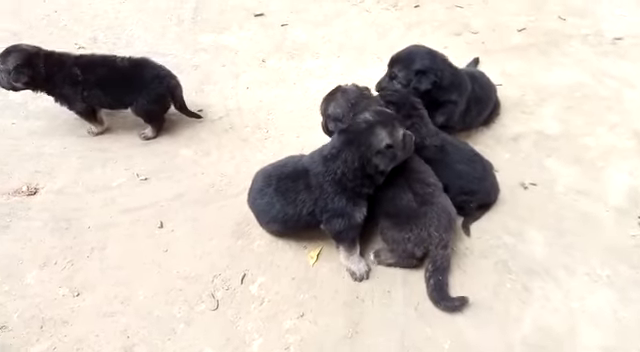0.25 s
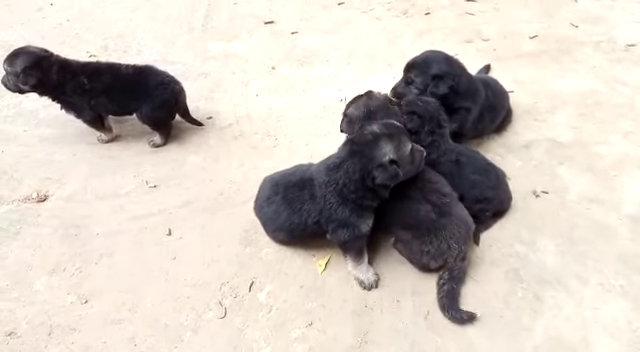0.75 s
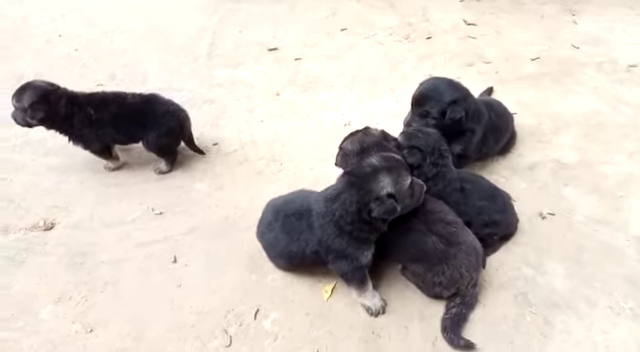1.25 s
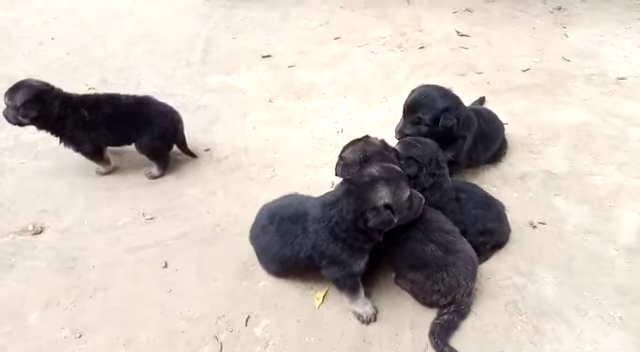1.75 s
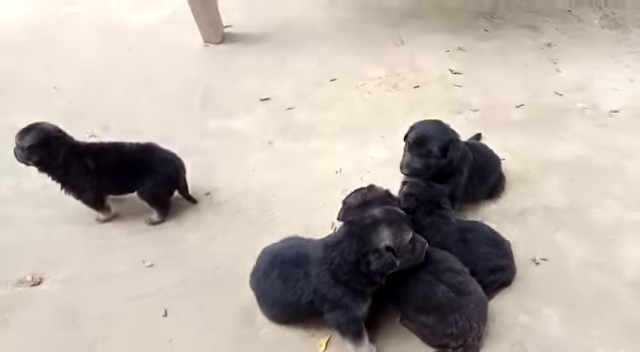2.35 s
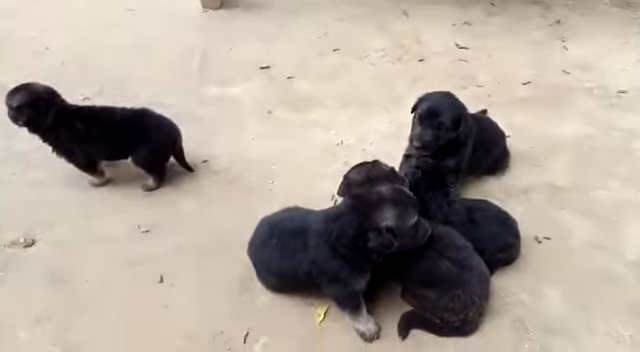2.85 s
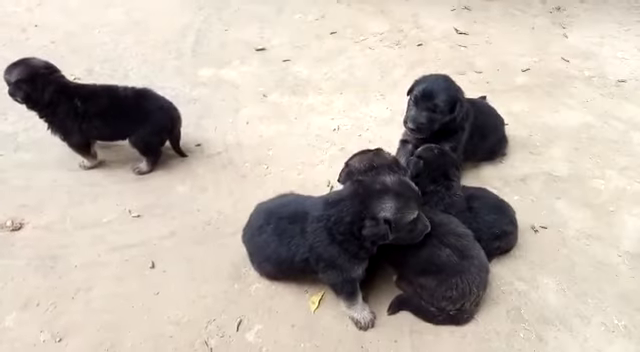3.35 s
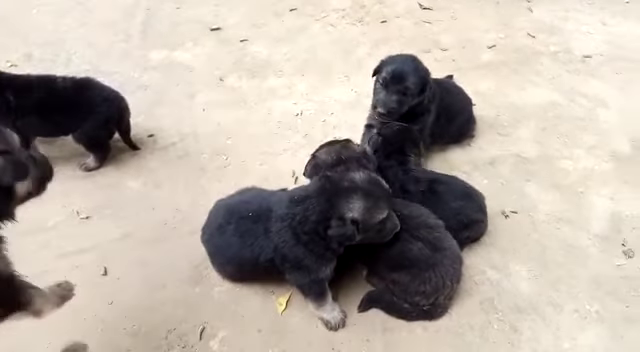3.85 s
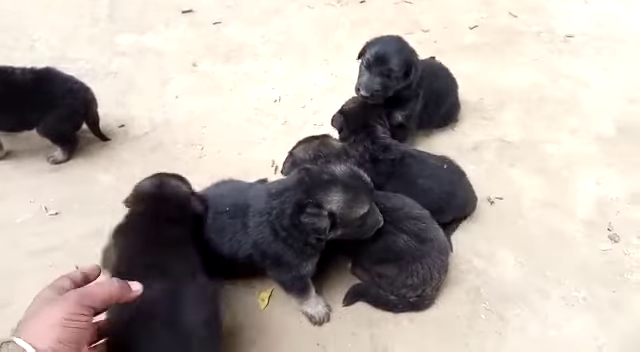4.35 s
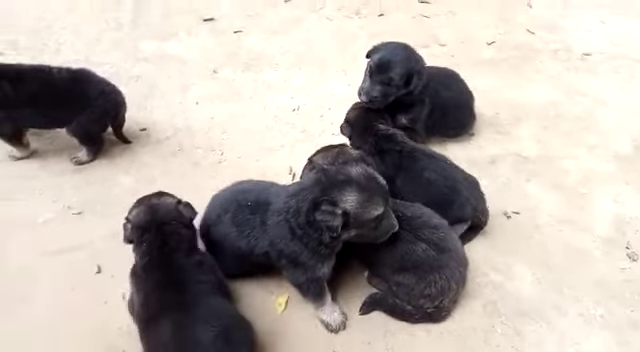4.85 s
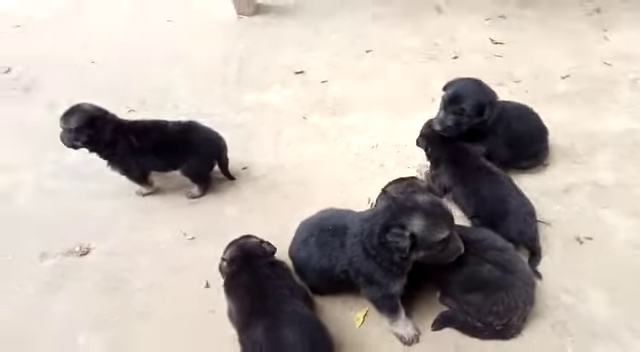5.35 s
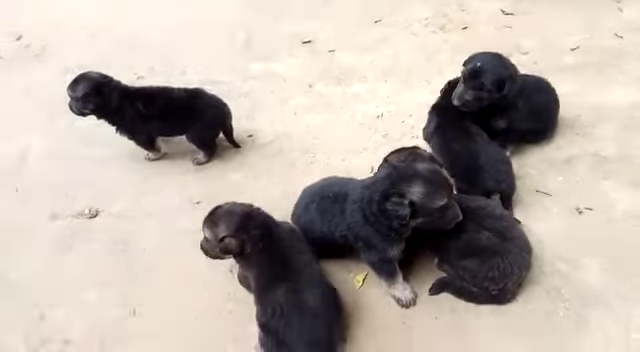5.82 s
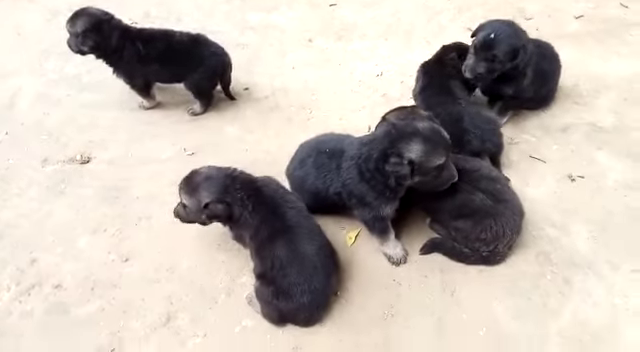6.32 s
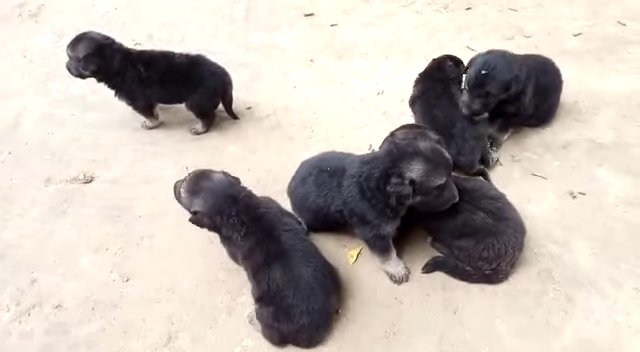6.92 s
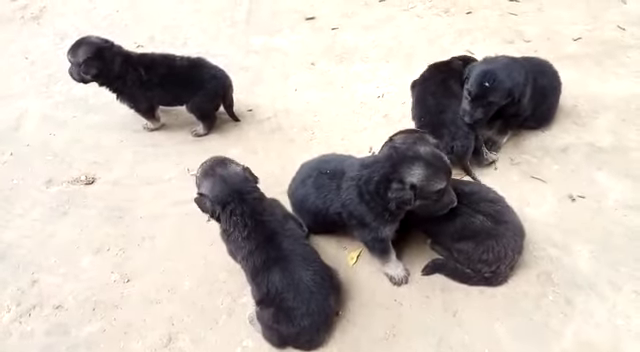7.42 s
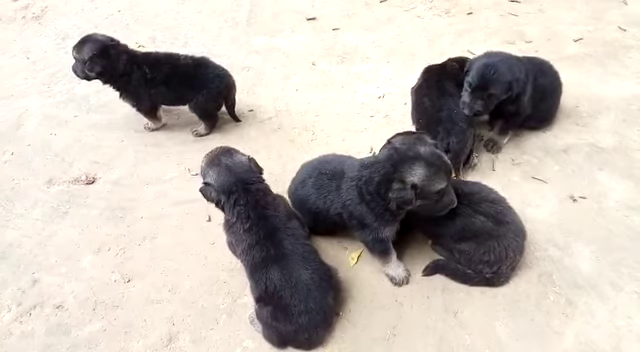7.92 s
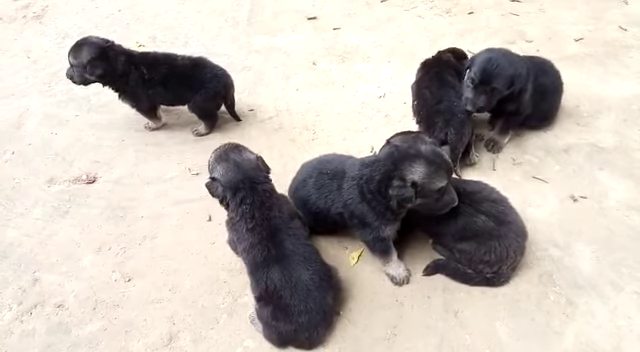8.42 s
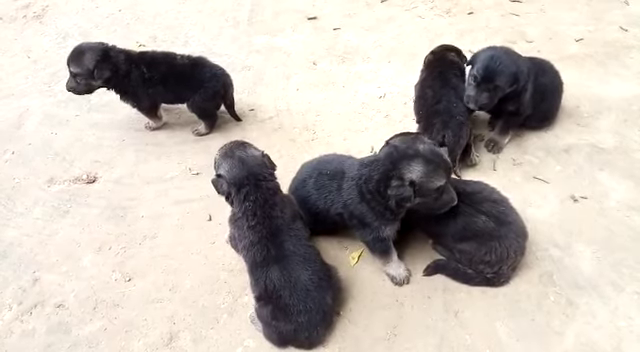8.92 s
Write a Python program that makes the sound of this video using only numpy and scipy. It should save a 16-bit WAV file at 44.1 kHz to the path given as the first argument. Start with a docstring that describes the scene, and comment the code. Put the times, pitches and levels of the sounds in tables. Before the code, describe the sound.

Close to the microphone, a litter of small puppies makes soft overlapping whines and short hoarse grunts. Three longer piercing whines come before the middle, then low moans and rasps, then a run of louder, sharp yelps. Small mouth smacks and nose huffs sit between. A little bird whistles quick phrases farther off in a walled outdoor yard, over faint rumble and rustle.

```python
"""Puppy litter in a walled yard

Thin arched whines overlap with hoarse grunts and sharp yelps: overtone stacks and rung pulse trains.
Smacks are damped noise pops, nose huffs shaped hiss. A small bird repeats two phrases of swept whistles.
Thin chirps of very high narrow noise fade out early on; rumble, rustle and hiss lie beneath.
Walls throw back the puppies, smacks and bird; both channels are alike.
"""
import sys
import numpy as np
from scipy import signal
from scipy.fft import rfft, irfft, next_fast_len
from scipy.io import wavfile
from scipy.ndimage import uniform_filter1d

SR = 44100
rng = np.random.default_rng(int(sys.argv[2]) if len(sys.argv) > 2 else 0)


def materialize(psi):
    """Save the field psi as 16-bit PCM at rate SR to the path in sys.argv[1].

    A 1-D psi becomes a single channel; in a 2-D psi each row is a channel.
    """
    bounded = np.clip(np.atleast_2d(psi).T, -1, 1)
    quanta = np.round(bounded * 32767).astype(np.int16)
    wavfile.write(sys.argv[1], SR, quanta)


N = 404838

# Puppy throat and mouth response: (frequency [Hz], relative level [dB])
THROAT_RESPONSE = [(700, 9), (1200, 7.5), (1700, 0.5), (2300, -2), (2900, -12), (3500, -30), (4200, -12),
                   (5100, 0), (6000, -10), (7000, -27.5), (8800, -37.5), (11500, -27), (15500, -52)]
# Open-mouthed yelps: (start [s], length [s], attack [s], hesitation [s], rise [s], first pitch [Hz],
#   top pitch [Hz], sagged pitch [Hz], final drop [0-1], fundamental before trim [dB],
#   fundamental swell over the call [dB], mouth overtones before trim [dB],
#   piercing overtones before trim [dB], overtone swell over the call [dB])
YELP_CALLS = [(2.52, .34, 0.028, 0.00043, 0.11, 1014, 1223, 1222, 0.31, -38, -14, -43.5, -33.5, 2),
              (3.037, 0.33, 0.025, 0.00065, 0.096, 1005, 1144, 1077, 0.14, -34, 7, -42.5, -28.5, 3.5),
              (3.579, 0.38, 0.056, 0.00066, 0.02, 1090, 1123, 1026, 0.19, -30.5, 15.5, -40, -28.5, 4.5),
              (5.939, 0.14, 0.04, 0, 0.12, 624, 1604, 1550, .09, -29, -39, -49.5, -35, -18),
              (6.29, 0.17, .035, 0.0043, 0.06, 1267, 1737, 1828, .15, -25, 12.5, -31, -16, -7),
              (6.638, 0.2, 0.017, .003, .09, 1191, 1719, 1293, 0.02, -22.5, 1.5, -34, -24, -27),
              (7.001, 0.2, 0.051, 0.0054, 0.07, 1213, 1618, 1253, .02, -20, 5, -39.5, -35, -21),
              (7.364, 0.27, 0.034, 0.017, 0.071, 1138, 1557, 1394, .1, -28.5, -20.5, -47.5, -47, -3.5),
              (8.41, .24, 0.071, .05, 0.078, 1166, 1450, 1409, 0.01, -25.5, 3.5, -29.5, -25.5, -18),
              (9.04, .15, 0.083, 0.0037, 0.08, 1002, 1088, 1023, 0.1, -42.5, 28, -35.5, -33, 8)]
# Soft whimpers: (start [s], length [s], rise [s], first pitch [Hz], top pitch [Hz], sagged pitch [Hz],
#   final drop [0-1], fundamental before trim [dB], fundamental swell over the call [dB],
#   overtones before trim [dB])
WHIMPER_CALLS = [(0.069, 0.42, 0.2, 950, 1230, 1130, 0.38, -41.5, -5, -50),
                 (0.098, 0.38, 0.018, 1148, 1115, 1064, 0.08, -46.5, -2, -45.0),
                 (0.548, 0.14, 0.085, 1014, 1417, 1191, 0, -45.5, -0.0, -47),
                 (0.801, 0.38, 0.11, 762, 1230, 807, 0.17, -42.5, 4.0, -57.5),
                 (0.895, 0.093, 0.032, 1262, 1562, 1174, 0.03, -34, 5, -38.5),
                 (1.458, 0.45, 0.07, 795, 1064, 717, 0.09, -43.5, 4, -54.5),
                 (2.018, 0.32, 0.18, 968, 1133, 992, 0.31, -43, 1.5, -52.5),
                 (2.381, 0.17, 0.0049, 930, 891, 858, 0.05, -44, 6.0, -56.5),
                 (3.12, 0.2, 0.063, 1147, 1153, 701, 0.38, -40, -10, -45.5),
                 (3.328, 0.35, 0.098, 514.5, 400.7, 370, 0.05, -51, 5, -57.0),
                 (3.95, 0.22, 0.0098, 879, 850, 680, 0.39, -44.5, 0, -52.5),
                 (3.97, 0.31, 0.161, 1195, 1252, 1263, 0.06, -40.5, -4, -48),
                 (4.458, 0.4, 0.086, 312.5, 405.2, 308, 0.02, -45.5, -12, -61.5),
                 (4.532, 0.29, 0.072, 1370, 1280, 1088, 0, -37.0, -4.5, -46),
                 (4.547, 0.31, 0.02, 816, 795, 660, 0.06, -42.5, 0, -64),
                 (4.55, 0.28, 0.018, 1005, 964, 850, 0.03, -55, -21, -78),
                 (4.877, 0.13, 0.012, 593, 546.5, 331, 0.01, -42.5, 4, -58),
                 (5.035, 0.12, 0.063, 1183, 1182, 940, 0.02, -34, 5, -45),
                 (5.136, 0.25, 0.073, 900, 895, 915, 0, -42.5, -10, -55.5),
                 (5.359, 0.38, 0.068, 624, 788.5, 660, 0.64, -42, 3, -53.5),
                 (5.449, 0.12, 0.126, 955, 1450, 1498, 0.07, -42.5, -4.0, -50),
                 (6.018, 0.52, 0.034, 798, 775.5, 639, 0.75, -45.0, -3, -56.0),
                 (6.837, 0.16, 0.088, 723, 807, 748, 0.1, -43.5, 11, -54),
                 (6.979, 0.44, 0.074, 660.6, 708, 617, 0.4, -49, -5, -59),
                 (7.321, 0.15, 0.023, 778, 800, 740, 0.14, -44.5, 2, -61),
                 (7.382, 0.071, 0.096, 590, 783, 608, 0.01, -49, -18, -63),
                 (7.486, 0.2, 0.049, 595, 754, 560, 0.1, -46.5, -6, -63.5),
                 (7.804, 0.28, 0.074, 1067, 1507, 1354, 0.05, -35, 5.5, -46.5),
                 (7.859, 0.4, 0.059, 1010, 1231, 627, 0.0, -42.5, 3, -53),
                 (8.413, 0.25, 0.083, 642, 693, 708, 0, -53.5, -6, -56),
                 (8.602, 0.45, 0.082, 706, 796, 657, 0.39, -41.5, -2.5, -55.0)]
# Voice cracks, the waveform repeating every few cycles: (start [s], end [s], period [cycles], depth [0-1])
VOICE_CRACKS = [(3.016, 3.09, 3, 1), (3.572, 3.67, 3, 0.46), (3.977, 4.29, 3, 0.35), (4.555, 4.85, 6, 0.1),
                (5.033, 5.364, 5, 0.39), (9.026, 9.184, 2, 0.37)]
# Hoarse grunts and rasps: (start [s], end [s], resonance [Hz], width [Hz], level before trim [dB])
GRUNTS = [(0.035, 0.081, 1490, 151, -38.5), (0.274, 0.398, 845, 206, -34), (0.282, 0.378, 1550, 190.0, -38),
          (0.661, 0.722, 898, 78.6, -36), (1.153, 1.191, 545, 440, -38), (1.412, 1.416, 698, 79, -33.5),
          (1.846, 1.911, 670, 194, -40), (2.126, 2.14, 1290, 1240, -56), (2.322, 2.36, 712, 188, -36),
          (2.514, 2.578, 730, 204, -37), (2.765, 2.838, 1086, 690, -38), (2.861, 3.043, 1500, 1110, -41.5),
          (2.97, 3.08, 1323, 160, -36), (3.262, 3.386, 1710, 256, -32.5), (3.557, 3.627, 725, 215, -39.5),
          (3.773, 3.834, 697, 242, -43.5), (4.125, 4.301, 1280, 433, -42.5), (4.22, 4.289, 426, 51, -37),
          (4.959, 5.302, 2194, 286, -41), (5.082, 5.362, 1013, 335, -35), (5.585, 5.808, 1017, 385, -36.5),
          (5.996, 6.298, 1006, 326, -35), (6.052, 6.29, 1800, 430.0, -44), (6.527, 6.607, 1030, 336, -37),
          (7.046, 7.062, 2105, 310.0, -36), (7.377, 7.457, 432, 90, -51), (7.501, 7.674, 415, 111, -62),
          (8.371, 8.416, 2120, 423, -33), (9.149, 9.189, 2450, 380, -31)]
# Turbulence in a rasp by its length: (length [s], turbulence rms re pulse rms [ratio])
RASP_TURBULENCE = [(.13, .76), (.21, .33)]
# Low creaking grumble: (start [s], end [s], resonance [Hz], width [Hz], level [dB])
GRUMBLE = (4.29, 4.5, 1194, 2000, -54.5)
# Small scuffs and mouth smacks: (time [s], peak before trim [dB], ring [Hz])
SMACK_EVENTS = [(0.014, -25.5, 765), (0.77, -49, 785), (1.41, -57, 708), (1.639, -23.5, 593),
                (2.12, -26, 1100), (2.386, -26, 930), (6.636, -30, 2510), (7.423, -23, 1440)]
# Hissy nose huffs: (start [s], end [s], level [dB])
NOSE_HUFFS = [(0.266, 0.422, -45), (0.624, 0.714, -41.5), (1.32, 1.51, -48.5), (2.474, 2.85, -56),
              (2.938, 3.434, -53), (3.315, 3.416, -45), (3.497, 3.968, -43), (4.135, 4.326, -48.5),
              (4.672, 5.005, -53.5), (4.984, 5.343, -46.5), (5.915, 6.1, -43), (6.118, 6.27, -54),
              (8.273, 8.44, -50)]
# Bird notes in each phrase: (time in phrase [s], length [s], first pitch [Hz], middle pitch [Hz],
#   last pitch [Hz], level re phrase [dB])
SONG_NOTES = [(.001, .012, 5870, 7040, 5600, -5.5), (.011, 0.016, 5540, 6080, 5500, 4.5),
              (.028, 0.026, 5570, 5220, 6330, 9.5), (.056, 0.022, 8100, 6520, 6040, -1),
              (.092, .02, 7740, 6750, 5850, 0), (.11, 0.044, 5770, 4950, 3700, 4)]
TWITTER_NOTES = [(0, 0.0136, 5500, 5850, 5086, -12.5), (.012, .02, 5030, 4900, 4630, -2),
                 (.034, .018, 3620, 4210, 3730, -12), (.056, .032, 3650, 4250, 3300, -5.5)]
# Starts of each bird phrase: (time [s], level [dB])
SONG_STARTS = [(0.098, -27.5), (3.758, -27), (7.822, -23)]
TWITTER_STARTS = [(0.481, -26.5), (1.517, -27), (2.762, -24), (3.91, -27.5), (4.986, -29), (5.959, -32.5),
                  (6.843, -27.5), (8.249, -25.5)]
# Background level: (time [s], low rustle before trim [dB], high hiss before trim [dB])
BACKGROUND_LEVELS = [(0, -51.5, -61.5), (2.7, -52.5, -66.5), (3.9, -50.5, -52.5), (5.2, -44, -82),
                     (5.5, -65, -66), (6.1, -50, -74), (6.801, -76, -69), (7.698, -61, -69),
                     (8.4, -51, -69), (9.18, -65, -69)]
# Noise colours: (frequency [Hz], relative level per Hz [dB])
HISS_COLOUR = [(2000, -7), (3300, -9), (4200, 6), (5200, 5.5), (6500, -13.5), (8500, -7), (11500, 4),
               (14000, -14), (15800, -2)]
RUSTLE_COLOUR = [(100, -27), (200, 4), (400, 1), (800, 5), (1500, 3.5), (2300, 6), (3200, -22.5),
                 (4300, -28), (5200, 0), (6800, -31), (15000, -26.5)]
RUMBLE_COLOUR = [(20, -33), (62, 2.5), (100, 2), (160, -2.5), (1000, -35), (15000, -41.5)]
# Diffuse tail decay: (frequency [Hz], time to fall 60 dB [s])
WALL_DECAY = [(200, 0.78), (1000, 0.32), (2500, 0.39), (5000, 0.32), (9000, 0.43), (15000, 0.19)]
# Wall echoes: (delay [s], gain before trim [ratio])
WALL_ECHOES = [(.0047, 0.24), (0.012, 0.11), (0.022, 0.15), (0.036, 0.1), (0.051, 0.1)]

EDGE_HZ = 15850
TIME_S = np.arange(N) / SR
SAG_CURVE, DROP_S = 1.3, .022  # pitch sags ever faster as breath runs out, drops as the folds let go
BASE_DB_PER_OCTAVE, RING_DB_PER_OCTAVE = 58, 17  # a yelp weakens away from its top pitch
ATTACK_DB, RELEASE_S, RELEASE_DB = -12.5, 0.026, -15  # release acts on the piercing overtones
GAPE_DB, GAPE_S = 10.5, 0.032  # the mouth gapes for a moment as the attack ends
WHIMPER_EDGE_S, WHIMPER_EDGE_DB = 0.036, -3
HUFF_EDGE_S = 0.046
NOTE_EDGE_DB = -10
CHIRP_START_S, CHIRP_PERIOD_S, CHIRP_LENGTH_S = 0.016, .268, 0.1
CHIRP_HZ, CHIRP_DB_AT_ZERO_S, CHIRP_FADE_DB_PER_S = 13370, -54.5, -8


def amp(db):
    """Decibels to gain."""
    return 10 ** (np.asarray(db) / 20)


def evened(x):
    """Scales to an rms of one."""
    return x / np.sqrt(np.mean(x ** 2) + 1e-20)


def read(points, hz):
    """Interpolates a spectrum on a log-frequency axis."""
    point_hz, value = np.transpose(points)
    return np.interp(np.log(hz + 1), np.log(point_hz + 1), value)


def add(mix, start_s, sound):
    """Lays a sound into the mix."""
    part = mix[max(round(start_s * SR), 0):][:len(sound)]
    part += sound[:len(part)]


def noise(size, gain):
    """Noise with the spectrum gain(Hz), scaled to rms one before trimming to size."""
    n = next_fast_len(size + 4096)
    spectrum = rfft(rng.standard_normal(n)) * gain(np.fft.rfftfreq(n, 1 / SR))
    return evened(irfft(spectrum, n))[:size]


def wander(size, rate_hz):
    """Random tremble: noise low-passed near rate_hz, nominal rms one."""
    step, pad = 16, 256  # one slow point per 16 samples
    n = next_fast_len(size // step + pad)
    lowpass = 1 / (1 + (np.fft.rfftfreq(n, step / SR) / rate_hz) ** 4)
    slow = irfft(rfft(rng.standard_normal(n)) * lowpass, n)
    return np.interp(np.arange(size) / step, np.arange(n), evened(slow))


def fade(t_s, edge_s):
    """Soft start and end, sine squared."""
    to_edge_s = np.minimum(t_s - t_s[0], t_s[-1] - t_s)
    return np.sin(np.pi / 2 * np.clip(to_edge_s / edge_s, 0, 1)) ** 2


def play(rows, margin_s):
    """Sample times around a table, and its columns joined by lines."""
    row_s, *columns = np.transpose(rows)
    t_s = np.arange(row_s.min() - margin_s, row_s.max() + margin_s, 1 / SR)
    return t_s, [np.interp(t_s, row_s, column) for column in columns]


def puppies(yelp_trim_db=1, whimper_trim_db=1, rasp_trim_db=-1, muffle_db=-3):
    """The litter: glottal overtone stacks for yelps and whimpers, rung pulses for grunts and grumble."""
    out = np.zeros(N)
    for call in YELP_CALLS:
        start_s, sound = cry(yelp(*call))
        add(out, start_s, amp(yelp_trim_db) * sound)
    for call in WHIMPER_CALLS:
        # a nearly shut mouth muffles the piercing overtones
        rows = [(*row, row[-1] + muffle_db) for row in whimper(*call)]
        start_s, sound = cry(rows, quaver=0.00938, jitter=0.0029, shimmer_db=2.0)
        add(out, start_s, amp(whimper_trim_db) * sound)
    for row in GRUNTS:
        turbulence = np.interp(row[1] - row[0], *np.transpose(RASP_TURBULENCE))
        start_s, sound = rasp(*row, turbulence=turbulence)
        add(out, start_s, amp(rasp_trim_db) * sound)
    add(out, *rasp(*GRUMBLE, flap_hz=100.5, turbulence=0.18))
    return out


def yelp(start_s, length_s, attack_s, hold_s, rise_s, first_hz, top_hz, sagged_hz, drop,
         base_db, swell_db, mouth_db, ring_db, overtone_swell_db):
    """Yelp pitch and levels: overtones swell in, loudness falls as pitch leaves its top."""
    t_s, progress, hz = arch(length_s, hold_s, rise_s, first_hz, top_hz, sagged_hz, drop)
    slack_octaves = np.minimum(abs(np.log2(hz / top_hz)), .5)
    attack_db = ATTACK_DB * np.clip(1 - t_s / attack_s, 0, 1)
    release_db = RELEASE_DB * np.clip(1 - (length_s - t_s) / RELEASE_S, 0, 1)
    overtone_db = attack_db + overtone_swell_db * progress
    gape_db = GAPE_DB * np.exp(-((t_s - attack_s) / GAPE_S) ** 2)
    return np.transpose([
        start_s + t_s,
        hz,
        base_db + swell_db * progress - BASE_DB_PER_OCTAVE * slack_octaves,
        mouth_db + overtone_db + gape_db,
        ring_db + overtone_db + release_db - RING_DB_PER_OCTAVE * slack_octaves])


def whimper(start_s, length_s, rise_s, first_hz, top_hz, sagged_hz, drop, base_db, swell_db, overtone_db):
    """Whimper pitch and levels: steady overtones, soft ends."""
    t_s, progress, hz = arch(length_s, 0, rise_s, first_hz, top_hz, sagged_hz, drop)
    ease_db = WHIMPER_EDGE_DB * (1 - fade(t_s, WHIMPER_EDGE_S))
    return np.transpose([start_s + t_s, hz, base_db + swell_db * progress + ease_db, overtone_db + ease_db])


def arch(length_s, hold_s, rise_s, first_hz, top_hz, sagged_hz, drop):
    """Cry pitch: scoop to the top, slow sag, quick last drop; returns times, progress -.5 to .5, Hz."""
    t_s = np.linspace(0, length_s, 80)
    scoop = (1 - np.clip((t_s - hold_s) / rise_s, 0, 1)) ** 2
    sag_length_s = max(length_s - hold_s - rise_s, .01)
    sag = np.clip((t_s - hold_s - rise_s) / sag_length_s, 0, 1) ** SAG_CURVE
    hz = top_hz + (first_hz - top_hz) * scoop + (sagged_hz - top_hz) * sag
    hz = hz * (1 - drop * np.exp((t_s - length_s) / DROP_S))
    return t_s, t_s / length_s - .5, hz


def cry(rows, quaver=.006, jitter=0.0031, shimmer_db=1.98, air_db=-33, onset_rough=3.2):
    """Vocal folds make a stack of overtones that glides through the throat's resonances."""
    t_s, (hz, base_db, mouth_db, ring_db) = play(rows, margin_s=.007)
    n = len(t_s)
    unsettled = 1 + onset_rough * (1 - fade(t_s, 0.066))  # folds are unsteady as they start and stop
    hz = uniform_filter1d(hz, size=600) * (1 + quaver * wander(n, 26.3))
    jittered_hz = hz * (1 + jitter * unsettled * wander(n, 250))
    phase = 2 * np.pi * np.cumsum(jittered_hz) / SR
    flutter = np.zeros(n)
    for start_s, end_s, cycles, depth in VOICE_CRACKS:
        inside = np.clip(np.minimum(t_s - start_s, end_s - t_s) / 0.00085, 0, 1)
        flutter += depth * inside * (np.cos(phase / round(cycles)) + 0.44 * wander(n, 280))
    voice = amp(base_db) * np.sin(phase)
    for k in range(2, int(EDGE_HZ / np.median(hz)) + 1):
        high = np.clip((k * hz - 3050) / 450, 0, 1)  # 0 in the mouth's range, 1 in the piercing one
        level_db = read(THROAT_RESPONSE, k * hz) + (1 - high) * mouth_db + high * ring_db
        overtone = amp(level_db + shimmer_db * wander(n, 16.3)) * np.sin(k * phase)
        voice += overtone * (k * hz < SR / 2)
    # turbulence at the folds
    air = noise(n, lambda f_hz: amp(read(THROAT_RESPONSE, f_hz)) * (f_hz > 1900))
    air = air * unsettled * amp(air_db + np.maximum(mouth_db, ring_db))
    sound = voice * (1 + flutter) + air
    return t_s[0], np.sqrt(2) * sound * fade(t_s, 0.0046) * amp(shimmer_db * wander(n, 62))


def rasp(start_s, end_s, hz, width_hz, level_db, turbulence, flap_hz=284, uneven=0.03, throat_db=-19):
    """Slack folds flap unevenly; their pulses and some turbulence ring one resonance."""
    t_s = np.arange(start_s - .008, end_s + 0.01, 1 / SR)
    n = len(t_s)
    f_hz = np.fft.rfftfreq(n, 1 / SR)
    turns = np.cumsum(flap_hz * (1 + uneven * wander(n, 70))) / SR
    pulses = evened(np.diff(np.floor(turns), prepend=0))
    drive = rfft(pulses + turbulence * rng.standard_normal(n))
    ring = evened(irfft(drive / (1 + (2 * (f_hz - hz) / width_hz) ** 4), n))
    throat = evened(irfft(drive * amp(read(THROAT_RESPONSE, f_hz)) * (f_hz > hz), n))
    return t_s[0], amp(level_db) * evened((ring + amp(throat_db) * throat) * fade(t_s, 0.027))


def smacks(decay_s=0.0045, trim_db=-5):
    """Mouths and paws pop: noise round one ring frequency, quickly damped."""
    out, t_s = np.zeros(N), np.arange(2000) / SR
    for start_s, peak_db, hz in SMACK_EVENTS:
        ringing = noise(len(t_s), lambda f_hz: f_hz / (f_hz + hz) / (1 + ((f_hz - hz) / (0.64 * hz)) ** 2))
        pop = ringing * t_s * np.exp(-t_s / decay_s)
        add(out, start_s - .002, amp(peak_db + trim_db) * pop / abs(pop).max())
    return out


def huffs():
    """Air hisses through a nose, swelling and stopping softly."""
    level = np.zeros(N)
    for start_s, end_s, level_db in NOSE_HUFFS:
        t_s = np.arange(start_s, end_s, 1 / SR)
        add(level, start_s, amp(level_db) * fade(t_s, HUFF_EDGE_S))
    return level * patchy(HISS_COLOUR, depth_db=6.5)


def bird(warble=0.024):
    """A nearly pure whistle swept quickly through each note."""
    out = np.zeros(N)
    for notes, starts in ((SONG_NOTES, SONG_STARTS), (TWITTER_NOTES, TWITTER_STARTS)):
        for start_s, phrase_db in starts:
            for note in notes:
                t_s, (hz, note_db) = play(bird_note(*note), margin_s=.001)
                phase = 2 * np.pi * np.cumsum(hz * (1 + warble * wander(len(t_s), 300))) / SR
                whistle = np.sin(phase) + 0.022 * np.sin(2 * phase)
                add(out, start_s + t_s[0], amp(phrase_db + note_db) * whistle * fade(t_s, 0.00033))
    return out


def bird_note(start_s, length_s, first_hz, middle_hz, last_hz, level_db):
    """One note: pitch bends once through three values, loudest mid-note."""
    u = np.linspace(-1, 1, 20)
    hz = middle_hz + u * (last_hz - first_hz) / 2 + u ** 2 * ((first_hz + last_hz) / 2 - middle_hz)
    return np.transpose([start_s + length_s * (u + 1) / 2, hz, level_db + NOTE_EDGE_DB * u ** 2])


def insect(count=12, width_hz=350):
    """Perhaps an insect: evenly spaced chirps of narrow, very high noise, growing fainter."""
    level, t_s = np.zeros(N), np.arange(0, CHIRP_LENGTH_S, 1 / SR)
    for start_s in CHIRP_START_S + CHIRP_PERIOD_S * np.arange(count):
        level_db = CHIRP_DB_AT_ZERO_S + CHIRP_FADE_DB_PER_S * start_s
        add(level, start_s, amp(level_db) * fade(t_s, 0.013))
    return level * noise(N, lambda f_hz: 1 / (1 + (2 * (f_hz - CHIRP_HZ) / width_hz) ** 4))


def background(rumble_db=-60, rustle_trim_db=6, hiss_trim_db=3):
    """Faint outdoor rumble, with a rustle and a hiss that swell and sink."""
    point_s, low_db, high_db = np.transpose(BACKGROUND_LEVELS)
    swell_db = 2 * wander(N, rate_hz=10.5)  # shared by all three
    rustle_db = np.interp(TIME_S, point_s, low_db) + rustle_trim_db + swell_db
    hiss_db = np.interp(TIME_S, point_s, high_db) + hiss_trim_db + swell_db
    rumble = amp(rumble_db + swell_db) * noise(N, lambda f_hz: amp(read(RUMBLE_COLOUR, f_hz)))
    rustle = amp(rustle_db) * patchy(RUSTLE_COLOUR, depth_db=6.5)
    hiss = amp(hiss_db) * patchy(HISS_COLOUR, depth_db=5.5)
    return rumble + rustle + hiss


def patchy(colour, depth_db):
    """Coloured noise whose level drifts in patches of time and frequency."""
    hz, _, cells = signal.stft(rng.standard_normal(N), SR, nperseg=512)
    patches = uniform_filter1d(rng.standard_normal(cells.shape), size=9, axis=0)
    patches = evened(uniform_filter1d(patches, size=9, axis=1))
    level_db = read(colour, hz)[:, None] + depth_db * patches
    return evened(signal.istft(cells * amp(level_db), SR)[1][:N])


def yard(x, echo_trim_db, tail_db):
    """Direct sound, a few wall echoes, and a diffuse tail that dies at its own speed in each band."""
    hz, t_s, cells = signal.stft(rng.standard_normal(SR), SR, nperseg=256)
    decay_db = -60 * t_s / read(WALL_DECAY, hz)[:, None]
    build_up = np.minimum(t_s / 0.022, 1)
    tail = signal.istft(cells * amp(decay_db) * build_up, SR, nperseg=256)[1]
    response = amp(tail_db) * tail / np.linalg.norm(tail)
    response[0] += 1
    for delay_s, gain in WALL_ECHOES:
        response[round(delay_s * SR)] += gain * amp(echo_trim_db)
    return signal.fftconvolve(x, response)[:N]


def scene():
    """Puppies close by, the bird farther off with stronger echoes, both channels alike."""
    near = yard(puppies() + smacks(), echo_trim_db=-4.5, tail_db=-14.5)
    far = yard(bird(), echo_trim_db=3.0, tail_db=-9.5)
    mix = near + far + huffs() + insect() + background()
    return np.array([mix, mix])


def record(dry):
    """The recorder's band limit: a linear-phase low-pass."""
    lowpass = signal.firwin(511, EDGE_HZ, window=("kaiser", 9), fs=SR)
    return signal.oaconvolve(dry, lowpass[None], "same")


dry = scene()
out = record(dry)
materialize(out)
```